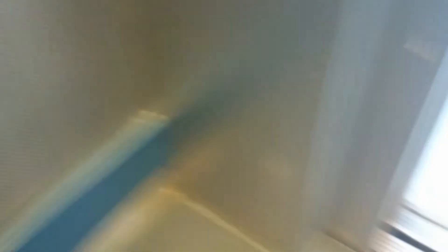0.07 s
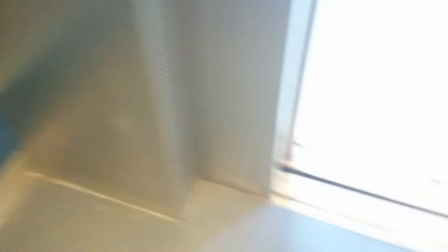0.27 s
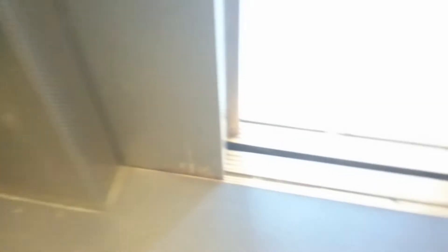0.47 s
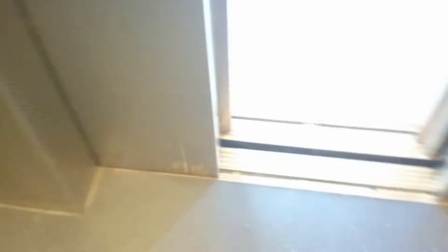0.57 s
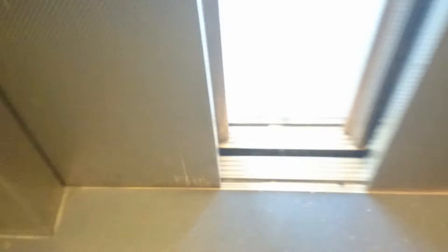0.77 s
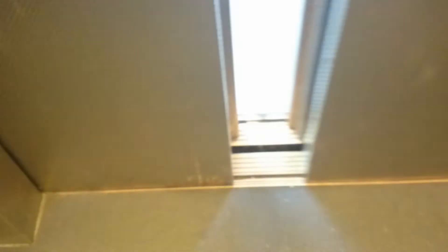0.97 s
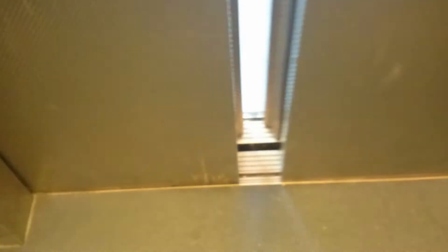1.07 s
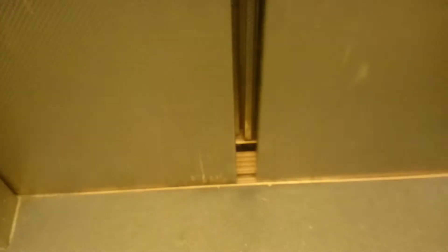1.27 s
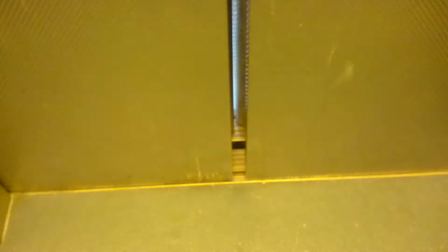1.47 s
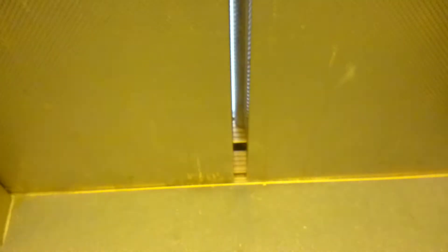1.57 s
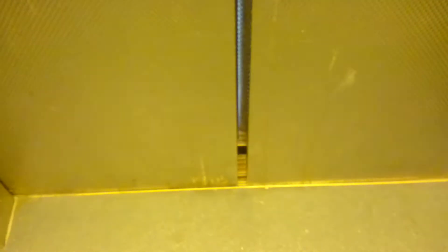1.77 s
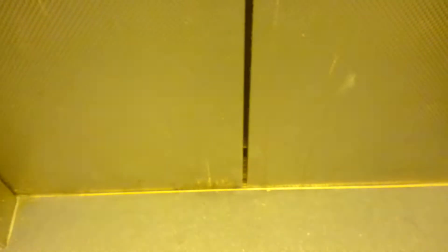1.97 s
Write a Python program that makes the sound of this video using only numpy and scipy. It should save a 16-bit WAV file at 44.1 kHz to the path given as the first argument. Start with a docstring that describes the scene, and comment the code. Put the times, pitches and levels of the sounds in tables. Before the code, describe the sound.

Automatic lift doors close, heard close up inside the small metal car: gritty hiss and low rumble, scattered clicks and faint squeaks, then a sharp ringing clunk, a softer meeting of panels and dull knocks.

```python
"""Inside a lift car in a shopping centre, steel doors slide shut over a steady air bed.
Shaped noise with fine grit gives the hiss of the guide shoes; the rollers rumble through car resonances.
The drive whines briefly on one wavering tone, low tones drone, hangers and coupler click and ring.
The lock drops with one sharp clunk: noise decaying band by band, panel modes and a tail.
The cushioned edges then meet softly, with soft low thuds before and after, and a few dull knocks."""
import sys
import numpy as np
from scipy import signal
from scipy.fft import rfft, irfft
from scipy.io import wavfile

SR = 44100
rng = np.random.default_rng(int(sys.argv[2]) if len(sys.argv) > 2 else 0)


def store_pcm(level_fs):
    """Save levels as 16-bit WAV."""
    pcm = np.round(np.clip(level_fs, -1, 1) * 32767).astype(np.int16)
    wavfile.write(sys.argv[1], SR, np.atleast_2d(pcm).T)


N = 89390

# Stereo likeness of the noise and modes. Each row: frequency in Hz, left-right likeness from 0 to 1.
LIKENESS = [(50, 0.6), (150, 0.92), (350, 0.8), (700, 0.58), (1400, 0), (3000, 0.13), (6000, 0.00018),
            (12000, 0.028)]
# Ringing modes of the door panels. Each row: frequency in Hz, level in dB, 60 dB decay time in s.
PANEL_MODES = [(174.1, -14.5, 0.41), (244.6, -25.5, 1), (327, -27, 0.88), (471.3, -17, 0.21),
               (492.5, -24.5, 0.54), (631, -19.5, 0.26), (660, -20.5, 0.35), (794, -21.5, 0.28),
               (890, -45, 0.37), (938, -31, 0.24), (1084, -28, 0.37), (1878, -19.5, 0.24),
               (4340, -20, 0.17), (5200, -13, 0.17)]
RISE_S, BASS_RISE_S = 0.00065, 0.013  # attack of sharp sounds; extra attack of the bass


def amp(db):
    """Decibels to gain."""
    return 10 ** (np.asarray(db) / 20)


def unit(x):
    """Scales to rms 1."""
    return x / np.sqrt(np.mean(x ** 2) + 1e-20)


def clock():
    """Time of every sample in seconds."""
    return np.arange(N) / SR


def bins():
    """Frequency of every spectrum bin in Hz."""
    return np.fft.rfftfreq(N, 1 / SR)


def across(points):
    """Reads a table over log frequency."""
    hz, value = np.transpose(points)
    return np.interp(np.log(bins() + 1), np.log(hz + 1), value)


def along(points, axis=1):
    """Reads one column of a table over time."""
    table = np.transpose(points)
    return np.interp(clock(), table[0], table[axis])


def delayed(x, s):
    """Starts a sound at time s."""
    start = max(round(s * SR), 0)
    return np.pad(x, ((0, 0), (start, 0)))[:, :N]


def coloured(colour_db, drive=None):
    """Noise, or a given drive, shaped by a spectrum, with the left-right likeness of the stereo pair."""
    source = rng.standard_normal((2, N)) if drive is None else drive
    a, b = rfft(source)
    same = across(LIKENESS)
    mid = a * np.sqrt(1 + same)
    side = b * np.sqrt(1 - same)
    return unit(irfft(np.array([mid + side, mid - side]) * amp(colour_db), N))


def fade(t60, rise):
    """Straight quick rise under an exponential decay."""
    return np.minimum(clock() / rise, 1) * amp(-60 * clock() / t60)


def wander(rate_hz):
    """Smooth random drift, low-passed noise at rms 1."""
    spectrum = rfft(rng.standard_normal(N)) / (1 + (bins() / rate_hz) ** 4)
    return unit(irfft(spectrum, N))


def tone(hz, waver, flutter_db):
    """A sine whose pitch and level wander, at rms 1."""
    turns = np.cumsum(hz * (1 + waver * wander(rate_hz=32.4))) / SR
    return unit(amp(flutter_db * wander(rate_hz=32)) * np.sin(2 * np.pi * turns))


def peak_db(hz, width):
    """A steep-sided resonance, 6 dB down at the edges of its width."""
    return -20 * np.log10(1 + (2 * (bins() - hz) / width) ** 2)


def shiver(colour, t60s, rise, bass_rise, count=10):
    """The dense ringing of sheet steel: each band dies at its own speed, the bass rises more slowly."""
    spectrum = rfft(coloured(across(colour)))
    centres = np.geomspace(100, 16000, count)
    decay = across(t60s)
    out = 0
    for hz, pick in zip(centres, np.eye(count)):
        band = irfft(spectrum * np.interp(bins(), centres, pick), N)
        band_rise = rise + bass_rise / (1 + (hz / 600) ** 2)
        out = out + band * fade(np.interp(hz, bins(), decay), band_rise)
    flutter_db = 0.1 * wander(rate_hz=130)  # very slight random flutter in the level of the ringing
    return out * amp(flutter_db)


def ring(modes, rise):
    """Decaying sines; the less alike the two sides are at a pitch, the further apart their phases."""
    same = across(LIKENESS)
    out = 0
    for hz, db, t60 in modes:
        lag = np.arccos(np.interp(hz, bins(), same)) * rng.choice([-.5, .5])
        phase = 2 * np.pi * hz * clock() + np.array([[lag], [-lag]])
        out = out + amp(db) * fade(t60, rise) * np.sin(phase)
    return out


def air():
    """Steady background: stationary noise, heaviest in the bass."""
    # Spectrum of the background. Each row: frequency in Hz, relative level in dB.
    air_colour = [(25, -3), (60, 9.5), (200, 0), (700, -2), (1500, -5.5), (3500, -18.5), (5200, -3.5),
                  (6500, -21.5), (9000, -24), (12000, -39), (15500, -28)]
    return amp(-43.5) * coloured(across(air_colour))


def deep_rumble():
    """Deep rumble under the rollers: low noise that swells and sinks."""
    # Swells of the rumble. Each row: time in seconds, level in dB.
    rumble_level = [(0, -34), (.22, -39.5), (.38, -35.5), (.52, -41), (.64, -47.5), (.92, -51), (1.1, -42),
                    (1.24, -47), (1.35, -40), (1.47, -32), (1.6, -44), (1.78, -43), (2.03, -40.5)]
    # Spectrum of the rumble. Each row: frequency in Hz, relative level in dB.
    rumble_colour = [(15, -42), (27, -21), (39, 1.5), (54, -0.5), (68, -0.5), (88, -18), (160, -19),
                     (600, -70)]
    return coloured(across(rumble_colour)) * amp(along(rumble_level))


def rollers():
    """Rollers on the track shake the car: low noise lifted at the car's resonances."""
    # Roll of the doors. Each row: time in seconds, level in dB.
    roll_level = [(0, -36), (.1, -36.5), (.22, -41.5), (.45, -50.5), (.7, -46.5), (.93, -49), (1.08, -39.5),
                  (1.27, -36.5), (1.42, -26.5), (1.56, -33), (1.68, -31), (1.76, -38.5), (1.9, -40.5),
                  (2.03, -53)]
    # Spectrum of the rolling. Each row: frequency in Hz, relative level in dB.
    roll_colour = [(30, -44), (80, -22), (115, -0.5), (140, -4.5), (190, -4.5), (270, -6), (400, -8.5),
                   (650, -10.5), (1000, -19.5), (2000, -24), (6000, -43)]
    # Resonances of the car. Each row: frequency in Hz, width in Hz, lift in dB.
    car_modes = [(105.2, 7.6, 9), (194.7, 10.4, 7), (259, 6, 9.5)]
    lift_db = sum(db / (1 + (2 * (bins() - hz) / width) ** 2) for hz, width, db in car_modes)
    return coloured(across(roll_colour) + lift_db) * amp(along(roll_level))


def drone():
    """The car drones on unsteady low tones while the drive presses the doors home."""
    # Swells of the drone. Each row: time in seconds, low tone level in dB, upper pair level in dB.
    drone_level = [(.92, -90, -92), (1.02, -78, -49), (1.09, -44, -41.5), (1.18, -43, -38.5),
                   (1.26, -40, -51), (1.37, -61, -52), (1.48, -37, -45), (1.58, -25.5, -45),
                   (1.7, -44, -37), (1.79, -41, -43.5), (1.87, -56, -36.5), (2.0, -43, -43)]
    # The upper pair of tones. Each row: frequency in Hz, relative level in dB.
    upper_pair = [(168, -5.5), (192, -4.5)]
    waver, flutter_db = .04, 2.5  # rms pitch drift as a fraction; rms level drift
    low = tone(105, waver, flutter_db)
    pair = sum(amp(db) * tone(hz, waver, flutter_db) for hz, db in upper_pair)
    return low * amp(along(drone_level)) + pair * amp(along(drone_level, axis=2))


def drive_whine():
    """One wavering, fluttering line from the door motor."""
    # Course of the whine. Each row: time in seconds, pitch in Hz, level in dB.
    whine = [(.55, 735, -54), (.7, 723.4, -55.5), (.82, 721, -48.5), (.92, 716, -47.5), (.98, 715, -48),
             (1.1, 732, -66)]
    running = (clock() > whine[0][0]) & (clock() < whine[-1][0])
    line = tone(along(whine), waver=.016, flutter_db=2.5)
    return running * amp(along(whine, axis=2)) * line


def grit(count=8, size=2000):
    """Tiny random slips at several contact points, each point with its own short ring."""
    slips_per_s, spread_db, t60 = 650, 1, 0.033  # slips over all points; loudness spread; ring in s
    out = 0
    for _ in range(count):
        struck = rng.random(N) < slips_per_s / count / SR
        slips = struck * amp(spread_db * np.minimum(rng.exponential(1, N), 4))
        short_ring = rng.standard_normal((2, size)) * fade(t60, RISE_S)[:size]
        out = out + signal.oaconvolve(slips[None], short_ring, axes=1)[:, :N]
    return unit(out)


def shoes():
    """Guide shoes rub along the sill: hiss with fine grit, brighter when they rub hard."""
    # Rub of the shoes. Each row: time in seconds, level in dB.
    slide_level = [(0, -35.5), (.08, -39.5), (.16, -39.5), (.24, -40), (.31, -36.5), (.38, -38), (.44, -37),
                   (.56, -38), (.7, -42), (.95, -44), (1.12, -37.5), (1.28, -42), (1.45, -47.5),
                   (1.8, -48.5), (2.03, -64.5)]
    # Spectrum of the hiss. Each row: frequency in Hz, relative level in dB.
    slide_colour = [(200, -4.5), (500, -1), (1000, -3), (2200, -1), (3500, -0.5), (4500, 2), (5350, 1),
                    (6100, -7), (8000, -17), (10500, -20), (12000, -23), (15500, -21)]
    # Spectrum of the treble fizz. Each row: frequency in Hz, relative level in dB.
    fizz_colour = [(3000, -34), (5000, 9.5), (6400, 0), (8000, -7), (10300, -9.5), (12000, -22),
                   (15500, -18)]
    grit_share = 0.32  # of the hiss power
    slips = grit()
    drive = np.sqrt(grit_share) * slips + np.sqrt(1 - grit_share) * rng.standard_normal((2, N))
    hiss = coloured(across(slide_colour), drive) * amp(along(slide_level))
    # the fizz gains 5.1 dB per dB of hiss, and sits at -43.5 dB when the hiss is at -37 dB
    fizz_db = -43.5 + 5.1 * (along(slide_level) + 37)
    return hiss + coloured(across(fizz_colour), slips) * amp(fizz_db)


def squeaks():
    """A shoe catches briefly and sings: narrow noise under a bell-shaped swell."""
    # Dry squeaks. Each row: centre in seconds, half length in seconds, level in dB, pitch in Hz, width in Hz.
    squeak_list = [(0.21, 0.042, -40.5, 5430, 120), (0.44, 0.05, -35, 4800, 1700),
                   (1.125, 0.027, -37, 5400, 160), (1.115, 0.043, -37.5, 1270, 210),
                   (1.753, .03, -52, 7600, 1600)]
    out = 0
    for s, half, db, hz, width in squeak_list:
        swell = np.exp(-((clock() - s) / half) ** 2)
        out = out + amp(db) * swell * coloured(peak_db(hz, width))
    return out


def knocks():
    """Dull damped knocks, each a noise burst with one broad resonance."""
    # Each row: start in seconds, level in dB, pitch in Hz, 60 dB decay time in s.
    knock_list = [(0.9686, -35, 1310, 0.17), (.969, -38.5, 634, 0.79), (1.829, -30, 560, 0.14),
                  (1.895, -42, 516, 0.13)]
    width, rise_s = 0.19, 0.0027  # width in log frequency
    out = 0
    for s, db, hz, t60 in knock_list:
        body_db = -20 * np.log10(1 + (np.log((bins() + 1) / hz) / width) ** 2)
        out = out + delayed(amp(db) * coloured(body_db) * fade(t60, rise_s), s)
    return out


def clicks():
    """Small steel parts of the hangers and coupler snap and ring: noise bursts over decaying modes."""
    # Each row: start in seconds, level in dB, 60 dB decay time in s, treble lift in dB.
    click_list = [(.08, -44, 0.089, 8), (.145, -37, .1, 2), (.21, -58, .06, 3), (.294, -37.5, 0.1, 6),
                  (.408, -36.5, 0.054, -3), (.422, -39, .12, 17), (.492, -37.5, 0.065, -8),
                  (.749, -48, 0.088, 9), (.907, -42, .15, 0), (0.9713, -41, 0.054, -7),
                  (1.0075, -26, 0.41, -19), (1.091, -43, 0.16, 7), (1.1743, -31, 0.28, -3.5),
                  (1.243, -47, .15, 18), (1.283, -35.5, 0.2, -5), (1.922, -43.5, 0.089, -11),
                  (1.98, -46, 0.33, 5)]
    # Spectrum of a click. Each row: frequency in Hz, relative level in dB.
    click_colour = [(100, -25), (500, -5.5), (1300, -5.5), (1900, -10.5), (3000, -5.5), (4300, -1.5),
                    (5350, 3.5), (6200, -10.5), (8500, -13.5), (15500, -19)]
    # Modes of the coupler. Each row: frequency in Hz, level relative to the click in dB, 60 dB decay in s.
    coupler_modes = [(3434, -10, 0.18), (3700, -13.5, 0.34), (3990, -16, 1), (4950, -4, 0.16),
                     (5460, -3, 0.15), (5650, -34, 0.41)]
    treble = 1 - 1 / (1 + (bins() / 9000) ** 4)  # the lift takes hold around 9 kHz
    out = 0
    for s, db, t60, lift_db in click_list:
        snap = amp(-8) * fade(t60=.02, rise=RISE_S)
        shape = fade(t60, rise=0.0015) + snap
        burst = coloured(across(click_colour) + lift_db * treble) * shape
        out = out + delayed(amp(db) * (burst + ring(coupler_modes, RISE_S)), s)
    return out


def panels_meet():
    """The cushioned edges meet: a softly rising shiver of steel and the panel modes."""
    # Spectrum of the meeting. Each row: frequency in Hz, relative level in dB.
    meet_colour = [(60, -10), (250, -5), (600, 0), (1100, 2), (1700, 2), (2400, 3), (3500, 4), (5300, 5),
                   (6500, -9.5), (8500, -13.5), (10000, -13), (12500, -29), (15500, -21)]
    # Decay of the meeting. Each row: frequency in Hz, 60 dB decay time in s.
    meet_t60 = [(200, 0.96), (1000, 0.9), (3000, 0.55), (5000, 0.64), (10000, 0.97), (15000, .55)]
    start_s, rise_s = 1.488, .017
    edges = amp(-20) * shiver(meet_colour, meet_t60, rise_s, BASS_RISE_S)
    panels = amp(-17) * ring(PANEL_MODES, rise_s)
    return delayed(edges + panels, start_s)


def thuds():
    """Soft low thuds before and after the panels meet: the car booms at its low resonances."""
    # Each row: start in seconds, gain in dB, swell in seconds.
    thud_list = [(1.203, -31, 0.051), (1.438, -22.5, 0.051), (1.66, -22, 0.01), (1.77, -28.5, .008)]
    # Boom of the car. Each row: frequency in Hz, level relative to the thud in dB, 60 dB decay time in s.
    boom_modes = [(64.6, 7, 0.14), (103, 1, 0.47), (196.5, -8, 0.15)]
    return sum(delayed(amp(db) * ring(boom_modes, swell), s) for s, db, swell in thud_list)


def clunk():
    """The lock drops: a crash through the panels, their modes, and the tail in the car."""
    # Spectrum of the crash. Each row: frequency in Hz, relative level in dB.
    clunk_colour = [(60, -32), (125, -23), (190, 9), (330, -3), (480, 5), (750, -2), (1100, 0.5),
                    (1400, -5.5), (1900, 0), (2300, -4), (3200, -3.5), (4300, 2.5), (5300, 0.5),
                    (6300, -12), (8700, -17), (10800, -12.5), (13000, -17), (15500, -18)]
    # Decay of the crash. Each row: frequency in Hz, 60 dB decay time in s.
    clunk_t60 = [(150, 0.4), (500, 0.23), (1000, 0.29), (2000, 0.18), (5000, 0.25), (10000, 0.23),
                 (15000, .15)]
    # Spectrum of the tail. Each row: frequency in Hz, relative level in dB.
    tail_colour = [(100, -16), (180, -7), (280, 17), (400, -2), (650, -4), (1100, 6), (1700, 3), (3500, 5),
                   (5300, 6), (6500, -5.5), (8500, -21), (12500, -46), (15500, -37)]
    start_s = 1.2945
    crash = shiver(clunk_colour, clunk_t60, RISE_S, BASS_RISE_S)
    tail = amp(-15) * coloured(across(tail_colour)) * fade(t60=0.68, rise=0.0067)
    panels = ring(PANEL_MODES, rise=0.0047)
    return delayed(amp(-6) * (crash + tail) + panels, start_s)


def scene():
    """Everything heard in the car."""
    running = deep_rumble() + rollers() + drone() + drive_whine() + shoes() + squeaks()
    closing = knocks() + clicks() + panels_meet() + thuds() + clunk()
    return air() + running + closing


def record(dry):
    """Two microphone ports of unlike colour, soft overload near full scale, and the band limit."""
    # Colour difference of the ports. Each row: frequency in Hz, left minus right in dB.
    port_tilt = [(35, -9), (100, -3.5), (200, -3.5), (700, -2.5), (2400, -2), (4200, -0.5), (5400, -10),
                 (6800, -1.5), (8200, -0.5), (10300, 8), (12000, 0), (14000, -5), (15500, -11)]
    ceiling, edge_hz = 1.0, 15950  # overload level at full scale; top of the band
    ports = irfft(rfft(dry) * amp(across(port_tilt) * np.array([[.5], [-.5]])), N)
    held = ports / (1 + (ports / ceiling) ** 6) ** (1 / 6)
    low_pass = signal.firwin(511, edge_hz, window=("kaiser", 9), fs=SR)
    return signal.oaconvolve(held, low_pass[None], "same")


dry = scene()
out = record(dry)
store_pcm(out)
```